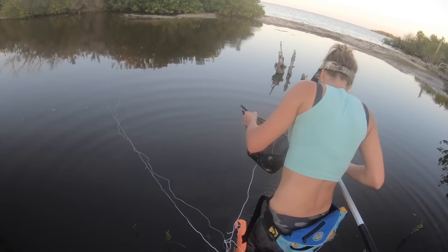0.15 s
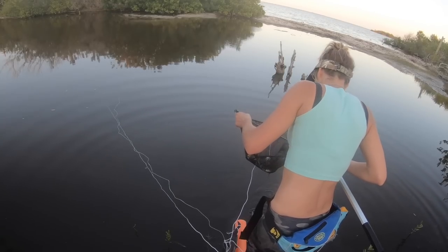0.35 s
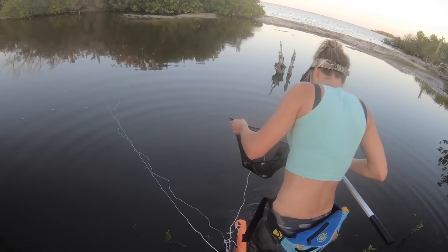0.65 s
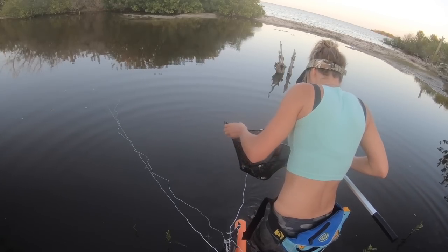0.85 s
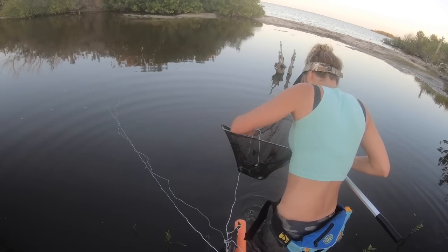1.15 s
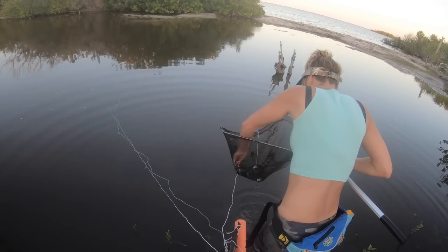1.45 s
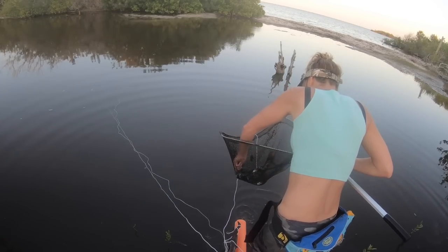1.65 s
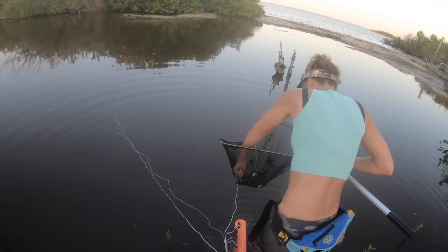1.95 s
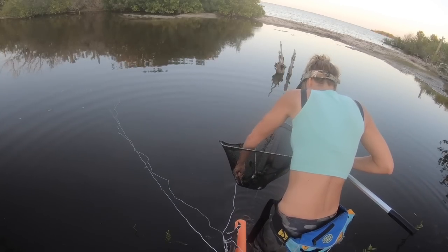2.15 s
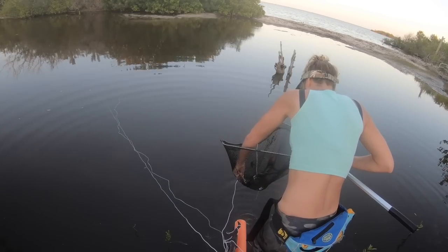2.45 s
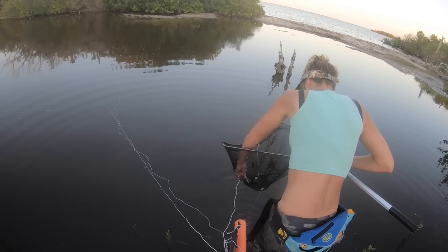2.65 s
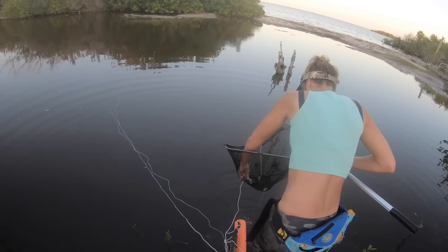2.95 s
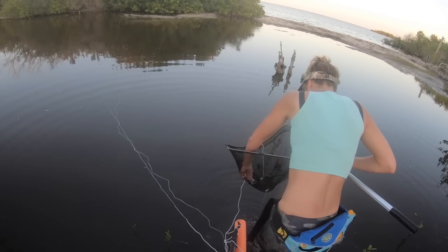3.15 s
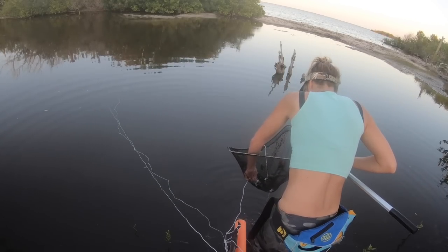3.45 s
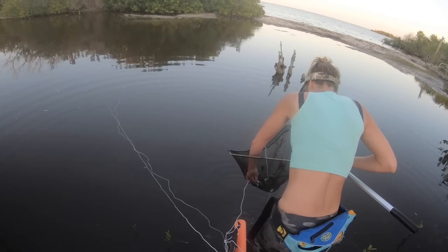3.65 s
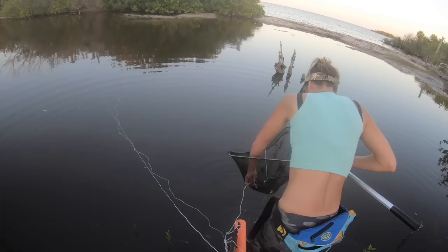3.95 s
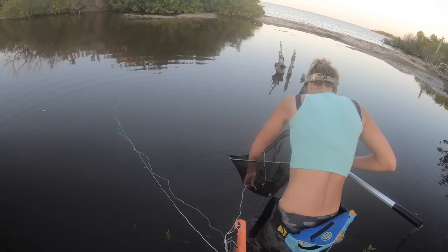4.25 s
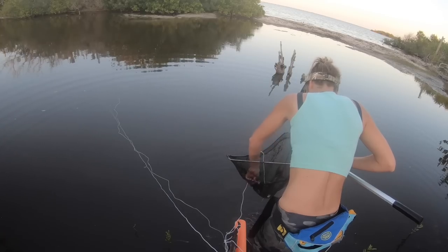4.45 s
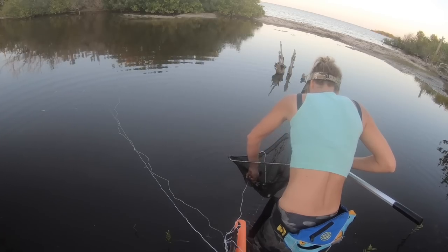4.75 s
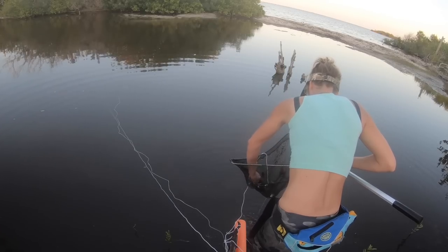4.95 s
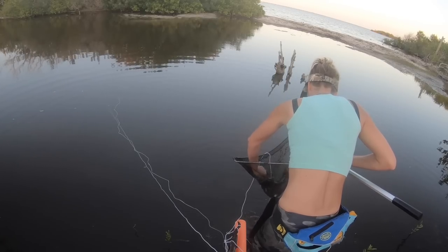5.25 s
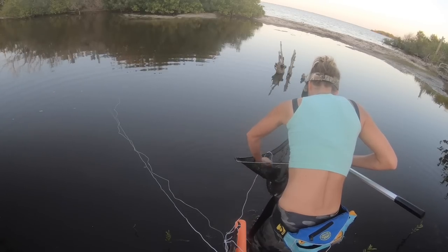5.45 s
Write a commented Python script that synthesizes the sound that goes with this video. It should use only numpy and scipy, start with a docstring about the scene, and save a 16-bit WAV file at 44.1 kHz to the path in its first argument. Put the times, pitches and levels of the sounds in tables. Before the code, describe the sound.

Close, irregular drips fall from a landing net into still water outdoors, some as sharp ticks and some as small rising plinks. At first, low wind rumble and soft knocks on the microphone accompany a fizzy trickle. The wind then settles and the runoff comes and goes while the dripping continues. Near the end the wet mesh rustles softly under a hand, over a very faint, even hush of distant water and air.

```python
"""A landing net is held just above a calm lagoon; light air buffets a close camera's two ports.
In the first second the camera is jostled and water runs off the tipped net, gurgling and fizzing.
Drops slap, tick on impact or plink as bubbles whose ring climbs; a hand rustles the wet mesh.
The breeze then eases and the drips go on. The runoff ebbs after 2 s, returns briefly near 3 s,
and picks up again with more rustling near 5.5 s."""
import sys
import numpy as np
from scipy import signal
from scipy.fft import rfft, irfft, next_fast_len
from scipy.io import wavfile
from scipy.ndimage import uniform_filter1d

SR = 44100
rng = np.random.default_rng(int(sys.argv[2]) if len(sys.argv) > 2 else 0)


def put_to_file(sound):
    """Save the sound as 16-bit audio at rate SR, in the file named by the first command-line argument."""
    columns = np.atleast_2d(sound).T  # one column per channel
    safe = np.clip(columns, -1, 1)
    whole_steps = np.round(safe * 32767)
    wavfile.write(sys.argv[1], SR, whole_steps.astype(np.int16))


N = 247386
NFFT = next_fast_len(N, True)
TIME_S = np.arange(N) / SR
FREQS_HZ = np.fft.rfftfreq(NFFT, 1 / SR) + 1

# Spectra of lagoon, wind buffet and wind flutter. Each row: frequency in Hz, relative level in dB.
LAGOON_SPECTRUM = [(400, -5), (600, -3), (810, 4.5), (1000, -5.5), (1250, -0.5), (1800, -5.5), (2400, -8),
                   (4000, -18.5), (7000, -20), (9500, -27.5), (11000, -32), (14000, -38)]
BUFFET_SPECTRUM = [(15, -13.5), (28, 5), (55, 9.5), (90, 7.5), (130, -3.5), (220, -29.5), (400, -65)]
FLUTTER_SPECTRUM = [(70, -27.5), (130, 3), (190, -1), (250, -10), (330, -18.5), (480, -32), (900, -59.5)]
# Breeze strength. Each row: time in seconds, level in dB.
BREEZE_LEVELS = [(0, -41.5), (.16, -47.5), (.34, -28), (.48, -42.5), (.57, -36), (.8, -41.5), (.88, -33.5),
                 (.97, -43), (1.24, -38), (1.37, -52), (1.5, -44), (2.25, -53.5), (2.66, -43),
                 (2.85, -59.5), (3.26, -48.5), (3.5, -59), (4.35, -50), (4.75, -60.5), (5.1, -49.5),
                 (5.61, -55.5)]
# Water flow off the mesh. Each row: time in seconds, level in dB.
FLOW_LEVELS = [(0, -83), (.14, -77.5), (.2, -59), (.41, -58), (.5, -67.5), (.6, -62.5), (.7, -67.5),
               (1.07, -63.5), (1.45, -66.5), (1.75, -62), (2.2, -77.5), (2.6, -78), (3.1, -66), (3.6, -73),
               (3.88, -70), (4.05, -74.5), (4.8, -79), (5.35, -71.5), (5.55, -64), (5.61, -82)]
# Drips: brief high ticks of impact, and longer bubble plinks that rise in pitch. Each row: start in
# seconds, initial pitch in Hz, level in dB, time to climb an octave in ms, ring decay in ms.
DRIPS = [(.082, 667, -47, 20.5, 2.8), (.107, 1105, -43, 51, 10.7), (0.1853, 2660, -49.5, 22, 5.7),
         (0.23, 720, -39.5, 12.7, 2.6), (0.2343, 3100, -25.5, 7.5, .9), (.257, 548, -52, 98, 9.8),
         (0.3149, 2540, -35, 7.3, .5), (0.3757, 1090, -46, 200, 10), (0.397, 3200, -39, 11, 1),
         (0.44, 1020, -49, 69, 3.5), (0.5316, 1173, -47.5, 24, 7), (0.5508, 3150, -33.5, 6, 3.4),
         (.574, 1800, -50, 29, 9.4), (.626, 474, -45, 17.3, 21), (0.6427, 2093, -41.5, 10.5, 8.3),
         (0.7345, 3250, -46.5, 46, 2.8), (.817, 672, -45, 66, 11.2), (0.832, 3190, -46.5, 100, 2.7),
         (.9195, 845, -54, 75, 28), (.941, 5010, -35, 11.3, 1.7), (.967, 3540, -39, 86, 1.9),
         (.9714, 544, -44, 105, 18), (1.0028, 3790, -26.5, 3.04, .7), (1.02, 520, -49, 130, 19),
         (1.052, 3180, -37.5, 300, 2.4), (1.0707, 2600, -37, 19, 1.3), (1.1498, 795, -38.5, 27, 4.6),
         (1.167, 980, -56, 43, 34), (1.2295, 605, -43.5, 14.2, 3.4), (1.2415, 876, -49, 83, 30),
         (1.2467, 2296, -31, 13.4, 1.1), (1.2603, 3540, -40, 22, 1.8), (1.2625, 1340, -33, 140, 1.8),
         (1.3858, 4420, -48, 41, 1.5), (1.418, 680, -43.5, 7, 42), (1.4694, 1455, -45.5, 230, 3.2),
         (1.6187, 1245, -51, 18.4, 13), (1.7128, 1196, -44, 7.8, 2), (1.7694, 1400, -36, 73, 2.1),
         (1.779, 800, -44.5, 13, 39), (1.897, 1070, -59, 180, 11), (1.9932, 4360, -48, 16, 1.9),
         (2.076, 741, -49.5, 250, 12), (2.2037, 2590, -39, 3.5, 2.2), (2.2573, 3930, -41.5, 4.8, .5),
         (2.291, 671, -57, 104, 17), (2.401, 2360, -45, 160, 0.95), (2.4407, 2100, -38, 75, 0.35),
         (2.6847, 2094, -46.5, 110, 2.6), (2.747, 564, -54, 23.3, 17), (2.8, 1496, -55.5, 45, 9),
         (2.8247, 2520, -47, 23, 2.2), (2.8468, 2180, -49, 12, 3.1), (2.873, 2330, -40.5, 13.4, 1.15),
         (2.8882, 4700, -46, 3.6, 0.59), (2.9079, 4800, -36.5, 3.5, 0.21), (3.0288, 2500, -42, 13, 1.9),
         (3.034, 1160, -55, 26, 48), (3.0474, 4800, -43, 5.2, 1.6), (3.082, 1580, -52, 200, 11),
         (3.0852, 906, -53, 69, 9.7), (3.137, 2187, -50, 24, 2.7), (3.178, 2200, -54.5, 25, 15),
         (3.2508, 890, -38, 18.3, 2.9), (3.329, 1170, -45.5, 8.5, 2), (3.33, 2040, -29.5, 6.5, 1.8),
         (3.362, 1080, -44.5, 21, 19), (3.458, 5740, -37.5, 9, 1.2), (3.5066, 2680, -51.5, 4, 0.38),
         (3.559, 2180, -51, 70, 3.4), (3.6834, 1029, -37.5, 220, 6.8), (3.696, 2900, -40, 26.4, 3.6),
         (3.7963, 5720, -40.5, 3.1, .5), (3.8577, 2570, -41.5, 30, 5.6), (3.863, 2880, -39, 3, .3),
         (3.8882, 2520, -51, 22, 3), (3.952, 838, -48, 340, 13), (4.06, 1365, -54, 20.6, 18),
         (4.1222, 1420, -39, 2.38, .4), (4.233, 3810, -45.5, 56, 0.95), (4.4616, 5950, -45.5, 3.4, .4),
         (4.4627, 1790, -42.5, 44, 0.32), (4.691, 1150, -48.5, 130, 4.4), (4.6897, 6250, -43.5, 4.9, 0.3),
         (4.6935, 3100, -46, 180, 1.1), (4.967, 1820, -48, 19, 0.72), (4.9966, 3100, -39.5, 300, 1.14),
         (5.18, 1200, -59, 106, 16), (5.1803, 2300, -40, 280, 0.92), (5.294, 2440, -46.5, 300, 2.4),
         (5.34, 1610, -53.5, 45, 4.6), (5.3843, 6170, -42, 8, 0.88), (5.4434, 7740, -43, 10, 1.9),
         (5.46, 1294, -50.5, 22.7, 14), (5.509, 3700, -45.5, 4.5, 0.64), (5.584, 690, -52, 65, 26)]
# Camera jostles. Each row: start in seconds, pitch in Hz, level in dB, length in ms.
CAMERA_BUMPS = [(0.082, 64, -25, 17.2), (0.316, 64, -29, 41), (0.33, 156.5, -27, 14.7),
                (0.554, 69, -32, 80), (0.57, 133, -29, 26), (0.737, 46.5, -27, 30), (0.85, 86, -27, 19),
                (2.642, 66, -40, 108), (4.831, 30.5, -39, 60)]
# Mesh drags. Each row: start in seconds, level in dB, length in ms.
MESH_RUSTLES = [(.2, -68, 130), (0.351, -60, 81), (2.001, -70.5, 100), (2.653, -62.5, 58),
                (4.805, -65.5, 23), (5.486, -56, 47), (5.54, -65, 86)]
# Drops that slap the surface. Each row: start in seconds, relative level in dB.
SLAP_DROPS = [(0.232, -43), (0.3146, -37.5), (.346, -61), (.387, -36.5), (.523, -44.5), (0.551, -41),
              (0.587, -40.5), (0.8127, -43.5), (0.865, -44.5), (.972, -44.5), (1.003, -41), (1.073, -41.5),
              (1.131, -37), (1.619, -40), (1.703, -46), (1.992, -37.5), (2.071, -47.5), (2.2337, -45),
              (2.259, -48), (2.4006, -47), (2.4367, -47.5), (2.671, -45.5), (2.814, -48), (2.91, -44),
              (2.933, -48), (3.029, -41), (3.3315, -40.5), (3.459, -39), (3.541, -46), (3.6846, -43.5),
              (3.7965, -49), (3.8585, -46.5), (3.95, -50.5), (4.126, -52), (4.248, -52.5), (4.425, -56),
              (4.462, -48.5), (4.69, -45.5), (4.968, -44), (4.9978, -44.5), (5.179, -44), (5.251, -47),
              (5.384, -48.5), (5.445, -55)]
# Spectra of the mesh (rustle, spray) and of slaps. Each row: frequency in Hz, relative level in dB.
MESH_SPECTRUM = [(400, -11.5), (1000, -1.5), (3200, -7), (6000, -10.5), (9000, -6), (11000, -32),
                 (15000, -20)]
SLAP_SPECTRUM = [(500, -31), (1200, -34), (3200, 0.5), (6000, -2), (9000, -8.5), (11000, -27), (15000, -29)]
# Port mismatch. Each row: frequency in Hz, left minus right in dB, left phase lead in radians.
PORT_MISMATCH = [(700, -1.5, -0.25), (1200, -2.5, 0.4), (2400, -4.5, -0.36), (3940, -3, -0.66),
                 (4870, -1.5, 0.048), (6000, 2.5, -1.26), (8400, -2.5, -2.23), (12000, -3, -0.73)]


def undb(db):
    """Decibels to gain."""
    return 10 ** (np.asarray(db) / 20)


def curve(table):
    """(time, value) rows, interpolated per sample."""
    return np.interp(TIME_S, *np.transpose(table))


def colour(x, spectrum):
    """Filter to a spectrum, rolled off past its ends; white noise keeps its power."""
    hz, db = np.transpose(spectrum)
    rolloff = 1 / (1 + (FREQS_HZ / hz[-1]) ** 8) / (1 + (hz[0] / FREQS_HZ / 2) ** 4)
    gain = rolloff * undb(np.interp(np.log(FREQS_HZ), np.log(hz), db))
    gain /= np.sqrt(np.mean(gain ** 2))
    return irfft(rfft(x, NFFT) * gain, NFFT)[:, :N]


def pan(db):
    """Stereo gains for a left minus right level."""
    gains = undb(np.array([[db], [-db]]) / 2)
    return gains / np.sqrt(np.mean(gains ** 2))


def noise(n, correlation):
    """Stereo white noise."""
    mid, side = rng.standard_normal((2, n))
    spread = np.sqrt(1 - correlation) * side * np.array([[1], [-1]])
    return (np.sqrt(1 + correlation) * mid + spread) / np.sqrt(2)


def grit(n, scatter_db):
    """Noise of a few strong and many weak specks."""
    specks = noise(n, correlation=0.97) * undb(scatter_db * np.minimum(rng.exponential(size=n), 5))
    return specks / specks.std()


def walk(rate_hz):
    """Smooth random wander, unit spread."""
    hold = int(SR / rate_hz)
    steps = np.repeat(rng.standard_normal(N // hold + 1), hold)
    smooth = uniform_filter1d(uniform_filter1d(steps, hold), hold)[:N]
    return smooth / smooth.std()


def add(out, start_s, sound):
    """Mix in a stereo sound."""
    i = int(np.clip(start_s * SR, 0, N - 1))
    out[:, i:i + sound.shape[1]] += sound[:, :N - i]


def lagoon(level_db=-68):
    """Even hush of distant water and air."""
    return colour(noise(N, correlation=0.028), LAGOON_SPECTRUM) * undb(level_db)


def wind(buffet_eddy_db=3, flutter_eddy_db=1.5, flutter_rest_db=-56.5, flutter_gust_db=-16):
    """Air rumbles on each port, swelling with eddies; gusts lift a steady flutter above it."""
    breeze = undb(curve(BREEZE_LEVELS))
    eddies = walk(rate_hz=16)
    buffet = colour(noise(N, correlation=0), BUFFET_SPECTRUM) * pan(-1.5)
    flutter = colour(noise(N, correlation=0.5), FLUTTER_SPECTRUM)
    flutter *= np.hypot(undb(flutter_rest_db), breeze * undb(flutter_gust_db))
    return buffet * breeze * undb(buffet_eddy_db * eddies) + flutter * undb(flutter_eddy_db * eddies)


def water_ring(hz, rise_ms, decay_ms, skew_rad):
    """A bubble's ring climbs until it dies at the surface; cut very short, it is an impact tick."""
    pinch_ms, swell_cycles, shallow_cycles = 0.097, 5.28, 46
    surface_climb_hz, tail_share = 1740, 0.3
    period_ms = 1000 / hz
    depth = rise_ms / period_ms / shallow_cycles
    swell_ms = pinch_ms + swell_cycles * period_ms / (1 + depth ** 2)  # deep bubbles start at once
    length_ms = min(swell_ms + 10 * decay_ms, 2.5 * rise_ms)
    ms = np.arange(int(length_ms * SR / 1000) + 8) * 1000 / SR
    climb_hz = hz * (ms / rise_ms) ** 2
    swell = np.sin(np.pi / 2 * np.minimum(ms / swell_ms, 1)) ** 2
    age = np.maximum(ms - swell_ms, 0) / decay_ms
    fade = (1 - tail_share) * np.exp(-age) + tail_share * np.exp(-age / 3)
    surfacing = np.exp(-(climb_hz / surface_climb_hz) ** 3)
    phase = 2 * np.pi * np.cumsum(hz + climb_hz) / SR
    port_rad = skew_rad * np.array([[.5], [-.5]])  # off-centre sound reaches the ports out of step
    return swell * fade * surfacing * np.sin(phase + port_rad)


def droplets(flow_db, count, low_hz, high_hz, decay_cycles):
    """Small bubbles of random size ring briefly; the tiny, high ones are weaker."""
    out = np.zeros((2, N))
    for (when, pitch), (size, ring, side) in zip(rng.random((count, 2)), rng.standard_normal((count, 3))):
        i = int(when * N)
        hz = low_hz * (high_hz / low_hz) ** pitch
        decay_ms = 1000 / hz * decay_cycles * np.exp(.7 * ring)
        db = flow_db[i] - 3 * pitch + 5.5 * min(size, 1.8) - 2 * ring
        add(out, i / SR, undb(db) * pan(4 * side) * water_ring(hz, 20 * decay_ms, decay_ms, side))
    return out


def runoff(spurt_db=2.5, gurgle_db=-1, trickle_db=5.5, spray_db=-10.5, burst_db=6):
    """Water spurts off the mesh, trickling and gurgling; films between strands fizz and shed spray."""
    flow_db = curve(FLOW_LEVELS) + spurt_db * walk(rate_hz=11)
    gurgle = droplets(flow_db + gurgle_db, count=380, low_hz=800, high_hz=2200, decay_cycles=4)
    trickle = droplets(flow_db + trickle_db, count=650, low_hz=2200, high_hz=5500, decay_cycles=2.5)
    fizz = droplets(flow_db, count=700, low_hz=4800, high_hz=9800, decay_cycles=3)
    spray = colour(grit(N, scatter_db=6.5), MESH_SPECTRUM)
    spray *= undb(flow_db + spray_db + burst_db * walk(rate_hz=180))
    return gurgle + trickle + fizz + spray


def drips(stray_db=1.3, skew_rad=0.73, waver_db=2.2, rough_db=1.5):
    """Impact ticks and bubble plinks; rings waver as bubbles deform, roughened by the broken surface."""
    out = np.zeros((2, N))
    waver = undb(waver_db * walk(rate_hz=250) + rough_db * walk(rate_hz=1600))
    for start_s, hz, db, rise_ms, decay_ms in DRIPS:
        side = rng.standard_normal()
        ring = water_ring(hz, rise_ms, decay_ms, skew_rad * side)
        add(out, start_s, undb(db) * pan(stray_db * side) * ring)
    return out * waver


def bumps():
    """Low swells of a few cycles as the camera is jostled."""
    out = np.zeros((2, N))
    for start_s, hz, db, length_ms in CAMERA_BUMPS:
        n = int(length_ms * SR / 1000)
        port_rad = rng.normal(0, 0.69, (2, 1))
        tone = np.sin(2 * np.pi * hz * np.arange(n) / SR + port_rad)
        add(out, start_s, undb(db) * np.hanning(n) * tone)
    return out * pan(-1.8)


def rustles():
    """Wet mesh drags over itself in gritty swishes."""
    out = np.zeros((2, N))
    for start_s, db, length_ms in MESH_RUSTLES:
        n = int(length_ms * SR / 1000)
        add(out, start_s, undb(db) * np.hanning(n) * grit(n, scatter_db=5))
    return colour(out, MESH_SPECTRUM)


def slaps(crack_ms=0.93, spatter_db=-17, spatter_ms=5, gain_db=-4):
    """A drop cracks on the surface; a gritty spatter follows."""
    out = np.zeros((2, N))
    ms = np.arange(SR // 20) * 1000 / SR
    for start_s, db in SLAP_DROPS:
        crack = np.exp(-ms / crack_ms) * noise(len(ms), correlation=0.57)
        spatter = undb(spatter_db) * np.exp(-ms / spatter_ms) * grit(len(ms), scatter_db=3.5)
        add(out, start_s, undb(db + gain_db) * (crack + spatter))
    return colour(out, SLAP_SPECTRUM)


def splashback(gain_db=-14, median_delay_ms=16, median_hz=3600):
    """Each slap throws up three droplets that fall back with tiny pings."""
    out = np.zeros((2, N))
    for slap_s, db in SLAP_DROPS:
        for late, pitch, size, side in rng.standard_normal((3, 4)):
            ping = water_ring(median_hz * np.exp(.35 * pitch), rise_ms=22, decay_ms=1.4, skew_rad=side)
            delay_s = median_delay_ms * np.exp(.6 * late) / 1000
            add(out, slap_s + delay_s, undb(db + gain_db + 3 * size) * ping)
    return out


def near_scatter(x, decay_ms=10, tail_db=-14):
    """Body, net frame and rippled water scatter a short tail."""
    ms = np.arange(SR // 10) * 1000 / SR
    response = noise(len(ms), correlation=1) * np.exp(-ms / decay_ms) * np.minimum(ms, 1)
    response /= np.sqrt(np.sum(response ** 2, axis=1, keepdims=True))
    return x + undb(tail_db) * signal.fftconvolve(x, response, axes=1)[:, :N]


def port_shading(x):
    """The camera body sets the ports apart in level and phase, band by band."""
    hz, db, radians = np.transpose(PORT_MISMATCH)
    lean_db = np.interp(np.log(FREQS_HZ), np.log(hz), db)
    lead_rad = np.interp(np.log(FREQS_HZ), np.log(hz), radians)
    gains = undb(np.array([lean_db, -lean_db]) / 2)
    gains /= np.sqrt(np.mean(gains ** 2, axis=0))
    turn = np.exp(1j * np.array([lead_rad, -lead_rad]) / 2)
    return irfft(rfft(x, NFFT) * turn * gains, NFFT)[:, :N]


def scene():
    """Close water over wind, bumps and the lagoon."""
    water = drips() + slaps() + splashback() + rustles() + runoff()
    return port_shading(near_scatter(water)) + wind() + bumps() + lagoon()


def record(dry):
    """The camera's steep low-pass."""
    cutoff_hz = 14800
    return signal.sosfilt(signal.ellip(8, .2, 70, cutoff_hz, fs=SR, output="sos"), dry)


dry = scene()
out = record(dry)
put_to_file(out)
```